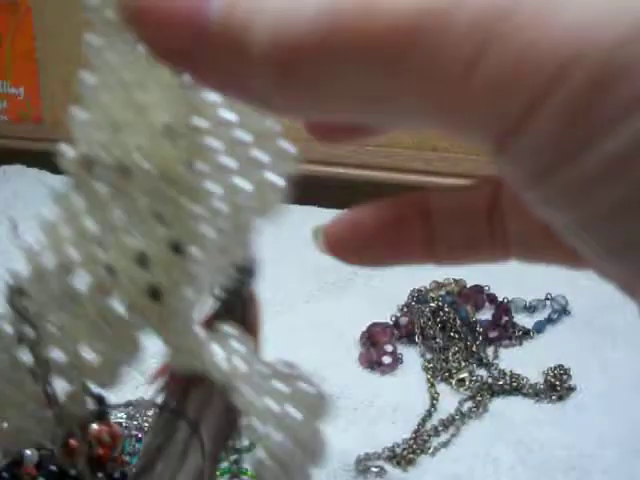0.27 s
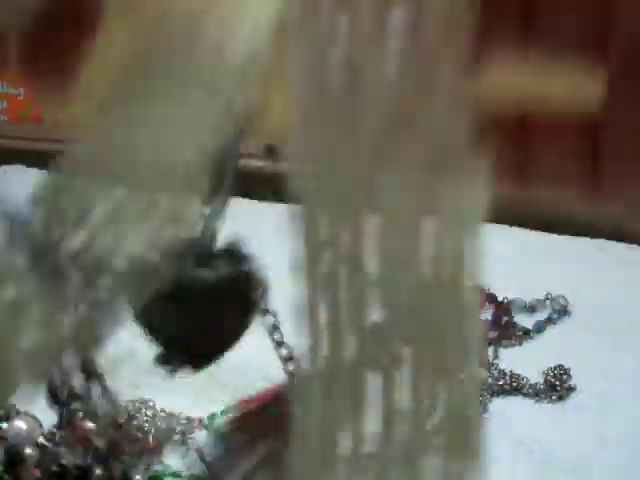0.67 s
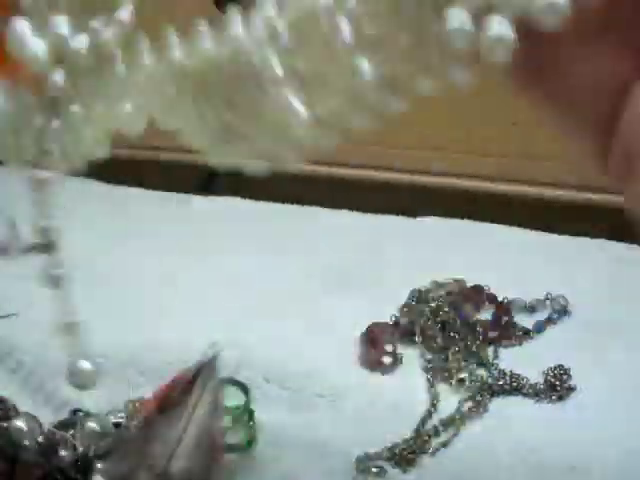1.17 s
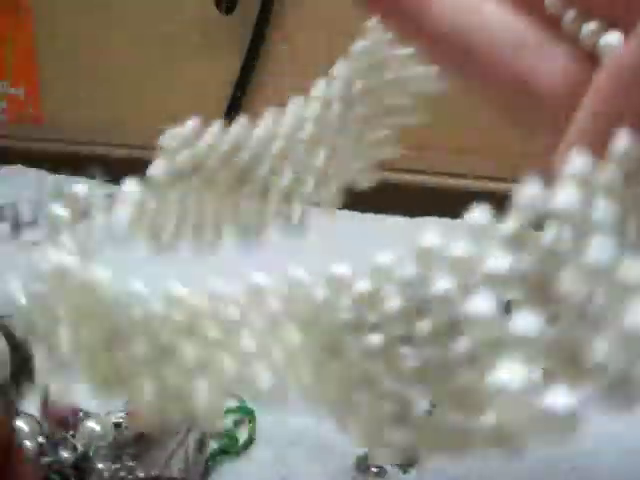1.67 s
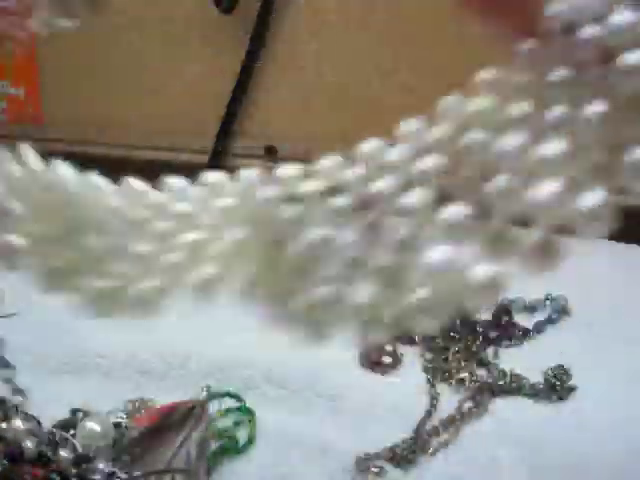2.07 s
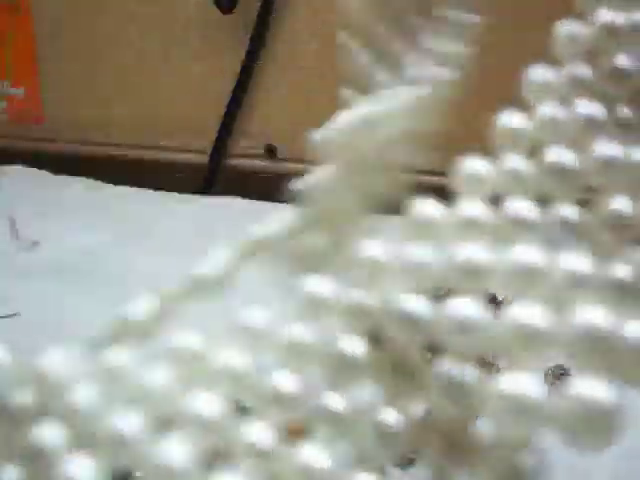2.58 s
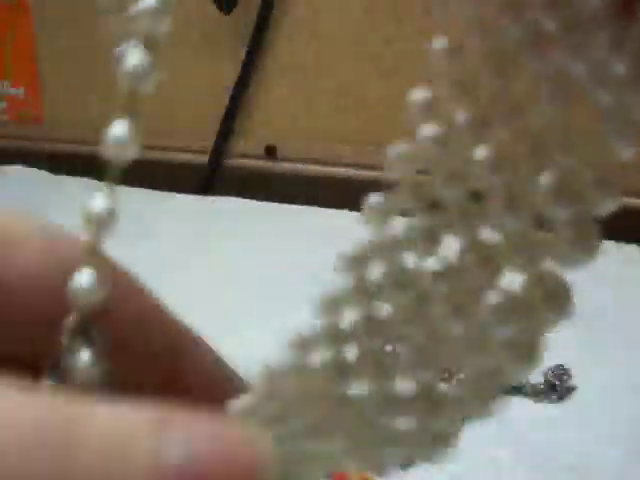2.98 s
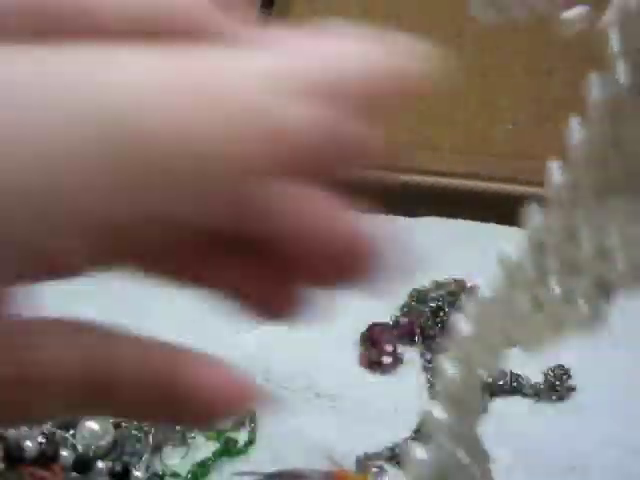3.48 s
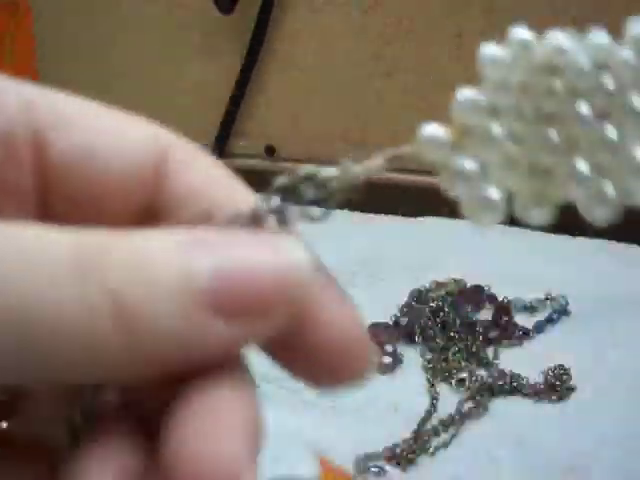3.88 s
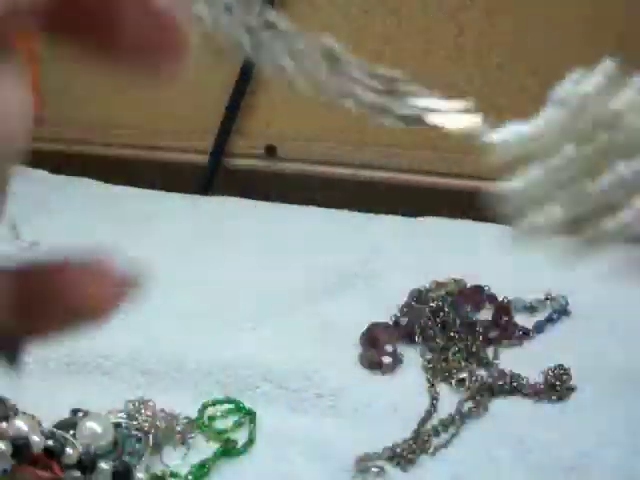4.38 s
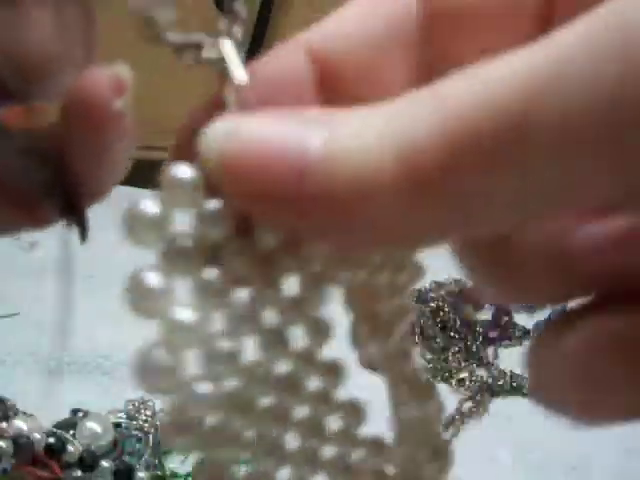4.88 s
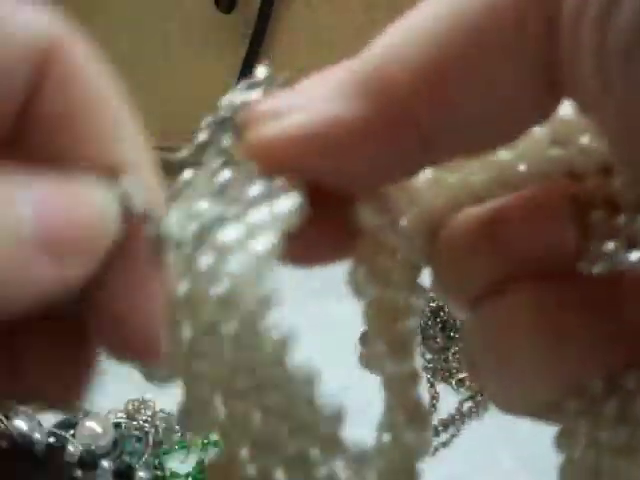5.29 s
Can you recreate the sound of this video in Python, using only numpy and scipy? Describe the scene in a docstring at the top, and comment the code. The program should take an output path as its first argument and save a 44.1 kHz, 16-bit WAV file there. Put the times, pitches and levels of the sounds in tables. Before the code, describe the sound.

Plastic pearl beads rattle and click close up, with a jingling metal earring that drops and a few loud hollow knocks, over faint hum.

```python
"""A cloth-covered table, heard close up through a small camera's narrow-band microphone, over hum and hiss.
A wide collar of plastic pearls is lifted from a heap of jewellery: its beads rattle and click together,
and a tangled metal earring jingles along. At 2.7 s the earring drops on the table with a clack and a thump.
From 3.1 s the loose strand swings against the camera's housing, loud and hollow, and slides along it.
Softer rattling and tinkling follow, and a last cluster of clicks at 5.4 s."""
import sys
import numpy as np
from scipy import signal
from scipy.fft import rfft, irfft, next_fast_len
from scipy.io import wavfile
from scipy.ndimage import map_coordinates

SR = 44100
rng = np.random.default_rng(int(sys.argv[2]) if len(sys.argv) > 2 else 0)


def wav_out(sig):
    """Save sig, one row per channel (or a flat mono array), as 16-bit PCM at SR to the path in sys.argv[1]."""
    wavfile.write(sys.argv[1], SR, np.round(np.clip(np.atleast_2d(sig).T, -1, 1) * 32767).astype(np.int16))


N = 243873


def amp(db):
    """Decibels to gain."""
    return 10 ** (np.asarray(db) / 20)


def unit(x):
    """Scaled to rms 1."""
    return x / np.sqrt(np.mean(x ** 2) + 1e-20)


def peaked(x):
    """Scaled to peak 1."""
    return x / np.abs(x).max()


def wobble(rate):
    """A smooth random curve, rate knots a second."""
    return map_coordinates(rng.standard_normal(int(N * rate / SR) + 4), [np.arange(N) * rate / SR])


def coloured(x, points):
    """x through a gain curve of (f/Hz, level/dB) points on a log frequency axis."""
    size = next_fast_len(len(x) + 8192)
    hz, db = np.transpose(points)
    gain = amp(np.interp(np.log(np.fft.rfftfreq(size, 1 / SR) + 1), np.log(hz), db))
    return irfft(rfft(x, size) * gain, size)[:len(x)]


def add(track, s, sound):
    """Mix a sound into the track at s seconds."""
    span = track[round(s * SR):][:len(sound)]
    span += sound[:len(span)]


def ring(hz, t60, attack, t):
    """One damped mode with a rounded start; t60 and attack in seconds."""
    return np.sin(2 * np.pi * hz * t) * amp(-60 * t / t60) * (1 - np.exp(-(t / attack) ** 2))


def crack(t60, t):
    """The short noise of a hard contact, peak 1."""
    band = signal.butter(3, [900, 5000], "band", fs=SR, output="sos")
    return peaked(signal.sosfilt(band, rng.standard_normal(len(t)) * amp(-60 * t / t60)))


def grains(rate, pitch_hz, spread, cycles, scatter_db, size):
    """Tiny contacts of random pitch and strength, about rate a second, each size samples long, rms 1."""
    count = 16000
    draw, pitch = rng.random((count, 3)), rng.standard_normal((count, 1))
    used = draw[:, 0] < rate * N / SR / count
    hz = np.clip(pitch_hz * np.exp(spread * pitch[used]), 500, 6000)
    strength = amp(scatter_db * np.minimum(-np.log(draw[used, 1:2]), 3))
    starts, k = (draw[used, 2:] * N).astype(int), np.arange(size)
    waves = strength * ring(hz, cycles / hz, .0001, k / SR)
    return unit(np.bincount((starts + k).ravel(), waves.ravel(), N)[:N])


def strokes(rows, attack_s, release_s):
    """A gain curve for each level column: every stroke rises, holds, then falls 20 dB per release_s."""
    t, gain = np.arange(N) / SR, 0
    for start, length, *db in rows:
        rise = np.clip((t - start) / attack_s + 1, 0, 1)
        fall = amp(-20 * np.maximum(t - start - length, 0) / release_s)
        gain = np.maximum(gain, amp(db)[:, None] * rise * fall)
    return gain


# Spectral shape of the rumble under the scene: f/Hz, level/dB
RUMBLE_SPECTRUM = [(15, -0.5), (30, -1), (45, 2.5), (65, -13), (110, -13.5), (170, -27), (400, -61.5)]
# Spectral shape of the steady hiss: f/Hz, level/dB
HISS_SPECTRUM = [(88, -39.5), (150, -21), (206, -2), (247, -8), (325, -6), (440, -12), (623, -5),
                 (703, -11), (966, -11.5), (1310, -12.5), (1690, -12.5), (2290, -14), (4200, -16.5),
                 (4810, -22.5), (5600, -19.5), (6000, -33.5), (6400, -54), (12300, -120)]
def background():
    """The noise floor at the table: a wavering low hum, rumble, and hiss with two faint resonances."""
    hum_hz = 44.5 + 2.51 * wobble(5.5)
    hum = amp(-46.0 + 0.47 * wobble(3.1)) * unit(np.sin(2 * np.pi * np.cumsum(hum_hz) / SR))
    rumble = amp(-43) * unit(coloured(rng.standard_normal(N), RUMBLE_SPECTRUM))
    hiss = amp(-58.0) * unit(coloured(rng.standard_normal(N), HISS_SPECTRUM))
    whine, t = np.zeros(N), np.arange(SR // 8) / SR
    for hz, db in (630, -66), (4930, -70.5):
        resonance = signal.fftconvolve(rng.standard_normal(N), ring(hz, .035, 0.00014, t))[:N]
        whine += amp(db) * unit(resonance)
    return hum + rumble + hiss + whine


def reflections(x):
    """The short answer of the table and the box behind it, reaching the microphone 2 ms late."""
    t = np.arange(SR // 4) / SR
    tail = rng.standard_normal(len(t)) * amp(-60 * t / 0.058) * (t > .002)
    return signal.fftconvolve(x, tail / np.linalg.norm(tail))[:N]


# Modes of the table under its cloth: f/Hz, level/dB, t60/s
TABLE_MODES = [(117.7, -2, 0.18), (210, -4.5, 0.068), (344, 4.5, 0.015), (506, -2, 0.023),
               (746, -0.5, 0.024)]
# Soft bumps through the table, close by: t/s, level/dB, most stirred f/Hz
TABLE_BUMPS = [(0.2798, -29.5, 390), (.945, -38, 260), (2.566, -37.5, 550), (2.726, -27, 142),
               (2.796, -36.5, 99), (4.166, -38, 650), (4.66, -35, 675), (4.666, -34.5, 260),
               (5.428, -35, 810), (5.435, -34.5, 720)]
def bumps(octave_off_db=-13):
    """Dull thumps of the table: the softer the contact, the lower the modes it stirs."""
    out, t = np.zeros(N), np.arange(SR // 4) / SR
    for s, db, centre_hz in TABLE_BUMPS:
        thump = np.zeros(len(t))
        for hz, mode_db, t60 in TABLE_MODES:
            contact_db = octave_off_db * np.log2(hz / centre_hz) ** 2
            thump += amp(mode_db + contact_db) * ring(hz, t60, 0.00026, t)
        add(out, s, amp(db) * peaked(thump))
    return out


# The strand sliding on the housing, right at the microphone: t/s, length/s, relative level/dB
STRAND_SLIDES = [(3.49, 0.13, -55)]
def slide():
    """The strand rubs softly along the housing in tiny dull slips."""
    gain, = strokes(STRAND_SLIDES, attack_s=0.13, release_s=.05)
    slips = grains(rate=320, pitch_hz=1210, spread=0.28, cycles=8.9, scatter_db=2.5, size=800)
    return amp(2.0) * gain * slips


# Runs of small chain links: t/s, length/s, relative level/dB
CHAIN_RUNS = [(2.845, .02, -43.5), (4.57, .02, -51), (4.695, .07, -53.5)]
def chain():
    """Small metal links tinkle over each other; the clasp gives one faint high chirp."""
    gain, = strokes(CHAIN_RUNS, attack_s=.008, release_s=.05)
    links = grains(rate=400, pitch_hz=3600, spread=0.064, cycles=30, scatter_db=4.5, size=800)
    out = amp(-1.0) * gain * links
    clasp = ring(5350, 0.046, 0.0033, np.arange(SR // 10) / SR)
    add(out, 4.433, amp(-43.0) * clasp)
    return out


# Modes of the earring's hoop: multiple of its pitch, level/dB, t60/s
HOOP_MODES = [(0.68, -14, .05), (.78, -4, 0.013), (0.998, 3, 0.061), (1.021, -11.5, 0.028),
              (1.471, -18.5, .05)]
def hoop(hz, t):
    """One touch of the hoop, peak 1: a tick, then its modes at new strengths."""
    tone = sum(amp(db + rng.normal(0, 2.0)) * ring(hz * ratio, t60, 0.0019, t)
               for ratio, db, t60 in HOOP_MODES)
    return peaked(peaked(tone) + amp(-22) * crack(0.005, t))


# The hardest taps on the earring: t/s, level/dB
EARRING_TAPS = [(.09, -45.5), (.416, -43.5), (.493, -41.5), (.529, -44), (1.014, -36), (1.022, -29.5),
                (1.04, -29.5), (1.238, -42.5), (1.437, -28), (1.453, -31.5), (1.502, -34.5), (1.809, -27.5),
                (1.9235, -33), (1.963, -35.5), (2.001, -28.5), (2.266, -37), (2.2825, -30.5), (2.342, -36),
                (2.364, -32), (2.578, -33), (4.577, -38)]
# Swings that shake it: t/s, length/s, relative jingle level/dB, relative link chatter level/dB
EARRING_SWINGS = [(.4, 0.17, -65, -67), (.81, 0.095, -49, -51), (.94, 0.084, -53.5, -61),
                  (1.02, 0.01, -43.5, -38.5), (1.2, 0.33, -61.5, -65), (1.44, 0.035, -42, -48),
                  (1.78, 0.04, -40, -46.5), (1.922, 0.0078, -44, -52), (1.982, 0.013, -41.5, -48),
                  (2.005, 0.071, -49, -64), (2.17, .09, -51.5, -51), (2.285, 0.12, -45.5, -54),
                  (2.39, 0.066, -45.5, -41.5), (2.47, 0.15, -50, -46.5), (2.7, 0.049, -42, -43),
                  (4.695, 0.031, -60, -58)]
def earring(pitch_hz=3430, drift=0.0093):
    """Beads tap the thin hoop, its pitch shifting with how it hangs; swings shake hoop and links."""
    t = np.arange(SR // 5) / SR
    taps, shiver = np.zeros(N), np.zeros(N)
    for s, db in EARRING_TAPS:
        add(taps, s, amp(db) * hoop(pitch_hz * rng.normal(1, drift), t))
    for hz in pitch_hz * (1 + 0.018 * np.linspace(-1, 1, 7)):
        touches = (rng.random(N) < 75 / SR) * rng.standard_normal(N)  # about 75 a second
        shiver += signal.fftconvolve(touches, hoop(hz, t))[:N]
    jingle_gain, chatter_gain = strokes(EARRING_SWINGS, attack_s=0.0069, release_s=0.051)
    links = grains(rate=220, pitch_hz=2385, spread=.07, cycles=90, scatter_db=3.0, size=1100)
    return taps + amp(-1.0) * jingle_gain * unit(shiver) + amp(-6.5) * chatter_gain * links


# Modes of a small metal trinket in the heap: f/Hz, level/dB, t60/s
TRINKET_MODES = [(1370, -6, 0.067), (2600, -11, 0.16), (3720, 2, 0.055), (4950, -9, 0.12)]
# The earring's pendant lands and bounces near the microphone: t/s, level/dB, f/Hz
PENDANT_BOUNCES = [(2.7275, -9, 2460), (2.7287, -8, 2740), (2.7319, -11, 2900), (2.7349, -6, 3056),
                   (2.7523, -20.5, 2110), (2.7557, -19, 3240)]
def landing():
    """The pendant strikes the heap several times within 30 ms; a nudged trinket pings just after."""
    out, t = np.zeros(N), np.arange(SR // 10) / SR
    for s, db, hz in PENDANT_BOUNCES:
        clack = ring(hz, .008, .0005, t) + amp(-27) * ring(hz * 1.05, .02, .0005, t)
        high_mode = amp(-15.5) * ring(hz * 1.54, .008, 0.000043, t)
        low_mode = amp(-23) * ring(hz * 0.628, 0.023, 0.0001, t)
        tone = peaked(clack + high_mode + low_mode)
        add(out, s, amp(db) * peaked(tone + amp(-22) * crack(0.03, t)))
    ping = sum(amp(db) * ring(hz, t60, .0002, t) for hz, db, t60 in TRINKET_MODES)
    add(out, 2.793, amp(-30.5) * peaked(ping))
    return out


MOVE_ATTACK_S, MOVE_RELEASE_S = .012, .09
# Hands flex the collar above the table: t/s, length/s, relative clack level/dB, relative tick level/dB
HAND_MOVES = [(.08, 0.15, -63, -60.5), (.39, 0.2, -61, -66), (.645, 0.086, -46, -48.5),
              (.785, 0.13, -41.5, -46.5), (.94, 0.32, -56.5, -54), (1.33, 0.71, -60.5, -57.5),
              (2.16, 0.4, -63.5, -57), (2.52, 0.064, -53.5, -50.5), (2.77, 0.063, -51, -61),
              (2.95, 0.21, -59, -59.5), (4.15, .62, -59, -63), (5.27, 0.052, -54.5, -59),
              (5.42, .1, -59.5, -73)]
def rattle(bunching_db=3.2):
    """The mesh of beads flexes: hollow clacks and finer ticks, bunched as whole rows tumble together."""
    clack_gain, tick_gain = strokes(HAND_MOVES, MOVE_ATTACK_S, MOVE_RELEASE_S)
    clacks = grains(rate=2200, pitch_hz=2286, spread=0.21, cycles=15, scatter_db=5.0, size=400)
    ticks = grains(rate=850, pitch_hz=4316, spread=0.19, cycles=16, scatter_db=5.0, size=200)
    bunching = unit(amp(bunching_db * wobble(170)))
    mesh = bunching * (amp(-1.5) * clack_gain * clacks + amp(-0.5) * tick_gain * ticks)
    # beads this small hardly radiate low notes
    return signal.sosfilt(signal.butter(2, 1250, "high", fs=SR, output="sos"), mesh)


def click(hz, crack_db):
    """Two beads snap together, peak 1: a crack and a few cycles of ring."""
    t = np.arange(SR // 25) / SR
    tone = peaked(ring(hz, 0.0062, 0.00049, t))
    return peaked(tone + amp(crack_db) * crack(0.0083, t))


# The clearest bead clicks, at close range: t/s, level/dB, f/Hz, crack level/dB relative to the ring
BEAD_CLICKS = [(.2363, -22.5, 2610, -13.5), (.437, -35.5, 2100, 1), (.527, -34, 2250, 1.5),
               (.563, -34.5, 2600, 20), (.646, -31.5, 4600, 1), (.669, -28.5, 2030, 6),
               (.7025, -26.5, 3600, -1), (.723, -34.5, 4100, -4), (.759, -29, 1990, -8),
               (0.784, -18.5, 2800, -15), (.8555, -22, 2470, -4), (.876, -33, 2200, -3),
               (.9103, -23, 2540, -1), (1.032, -26, 2380, -6), (1.106, -32, 3550, 14),
               (1.438, -27, 2810, -11), (1.7535, -27, 3400, -18), (1.809, -28.5, 3080, -7),
               (1.822, -31, 3180, 3), (2.184, -33, 2470, -10), (2.2823, -41.5, 3040, -12),
               (2.402, -35, 2430, 2), (2.518, -35.5, 2400, -13), (2.5552, -27, 3670, 14),
               (2.6945, -33.5, 2360, -6), (2.7925, -32, 3840, -7), (2.8318, -29, 2700, -12),
               (3.575, -31, 1950, 2), (3.828, -35, 3900, 0.5), (3.94, -34.5, 2370, 4.5),
               (4.167, -35.5, 1550, 4), (4.2696, -32, 4290, -5), (4.343, -39, 2200, 4),
               (4.368, -40.5, 3760, -10), (4.5753, -29, 3820, -4.5), (4.7537, -32.5, 2040, 4),
               (5.4294, -23.5, 2070, -5.5), (5.435, -27, 1940, 0), (5.458, -34.5, 1780, -1),
               (5.48, -35, 1880, 9), (5.514, -34, 1790, -6)]
def clicks(strays=180, stray_hz=2700, stray_lift_db=9):
    """Single clicks stand out of the rattle: clear ones, and strays that grow with the hands' effort."""
    out = np.zeros(N)
    for s, db, hz, crack_db in BEAD_CLICKS:
        add(out, s, amp(db) * click(hz, crack_db))
    effort = strokes(HAND_MOVES, MOVE_ATTACK_S, MOVE_RELEASE_S)[0]
    for at, (loud, high) in zip(rng.integers(N, size=strays), rng.standard_normal((strays, 2))):
        stray = click(stray_hz * np.exp(.22 * high), crack_db=1.5)
        add(out, at / SR, effort[at] * amp(stray_lift_db + 2.0 * loud) * stray)
    return out


# Modes of the plastic housing around the microphone: f/Hz, level/dB, t60/s
HOUSING_MODES = [(416, -23.5, 0.22), (640, -19.5, 0.078), (811, -12, 0.049), (928, -8, 0.037),
                 (1047, -11, 0.045), (1450, -8, 0.049), (1628, -6.5, 0.037), (1722, -6.5, 0.029),
                 (1897, -12.5, 0.063), (2196, -2, .04), (2338, -14, 0.092), (2774, -9, .03),
                 (3230, -11.5, 0.082), (3215, -1.5, .03), (3470, -7.5, 0.014), (3505, -16.5, .045),
                 (4600, -11.5, 0.022), (4857, -10, 0.023), (4866, -4.5, 0.027), (5780, -10, 0.014)]
def housing(hard_db, hollow_db, t, hollow_hz=946, hollow_octaves=0.16):
    """The shell rings from one blow: every spot stirs the modes differently; hard blows are brighter."""
    body = np.zeros(len(t))
    for hz, db, t60 in HOUSING_MODES:
        spot_db = rng.normal(0, 2.6)
        spot_db += hollow_db * np.exp(-(np.log2(hz / hollow_hz) / hollow_octaves) ** 2)
        strength = amp(db + spot_db + hard_db * np.log2(hz / 2500))
        body += rng.choice([-1, 1]) * strength * ring(hz * rng.normal(1, 0.0048), t60, 0.0003, t)
    # the strand falls back against the shell and damps it
    return peaked(body) * np.exp(-(t / .03) ** 2)


def blows(rows, followers=3, gap_s=.0065, drop_db=14.5, loss_db=3):
    """Each knock, then the next beads on the strand landing on the same spot, ever weaker."""
    for s, db, hard_db, hollow_db in rows:
        yield s, db, hard_db, hollow_db
        for k in range(followers):
            late_s = gap_s * (k + 1 + rng.uniform(-.15, .15))
            follower_hard_db = rng.normal(-2, 1.6)
            yield s + late_s, db - drop_db - loss_db * k, follower_hard_db, hollow_db


# Knocks on the housing, right at the microphone: t/s, level/dB, hardness/dB per octave, hollowness/dB
HOUSING_KNOCKS = [(3.096, -0.2, 4.5, 1.5), (3.122, -11, 2, 2.5), (3.153, -24.5, -4, 6),
                  (3.1799, -20.5, -5.5, -8), (3.186, -17, -6, 2), (3.2008, -18.5, -1, 9.5),
                  (3.218, -21.5, -3, 0), (3.234, -23.5, -3.5, 0), (3.3565, -6, 0, 4.5)]
def knocks():
    """Beads hit the housing: a dull push, the bead's own brief ring and the ring of the shell."""
    out, t = np.zeros(N), np.arange(SR // 8) / SR
    for s, db, hard_db, hollow_db in blows(HOUSING_KNOCKS):
        bead = peaked(ring(2463, 0.0051, 0.003, t))
        bead += amp(hard_db + 3) * peaked(ring(4880, 0.0089, 0.00055, t))
        push = amp(-22) * peaked(ring(520, .004, 0.0019, t))
        shell = housing(hard_db, hollow_db, t)
        add(out, s, amp(db) * peaked(shell + amp(-10) * bead + push + amp(-9.0) * crack(0.0098, t)))
    # the knocks carry little below about 340 Hz
    return signal.sosfilt(signal.butter(3, 340, "high", fs=SR, output="sos"), out)


def scene():
    """Everything at the one microphone; heap and housing are too close for reflections to matter."""
    lifted = rattle() + clicks() + earring() + chain()
    close = landing() + knocks() + slide() + bumps()
    return (lifted + amp(-10.5) * reflections(lifted) + close + background())[None]


# Response of the camera's microphone: f/Hz, level/dB
MIC_RESPONSE = [(5200, 1.5), (5600, -0.5), (6000, -11.5), (6300, -33.5), (6800, -38.5), (8000, -81)]
def record(dry, ceiling=.74, top_hz=16500):
    """A mono microphone that falls away near 6 kHz and clips on the loudest peak."""
    narrow = coloured(dry[0], MIC_RESPONSE)
    clipped = narrow / (1 + np.abs(narrow / ceiling) ** 40) ** (1 / 40)
    return signal.sosfiltfilt(signal.butter(12, top_hz, fs=SR, output="sos"), clipped)[None]


dry = scene()
out = record(dry)
wav_out(out)
```